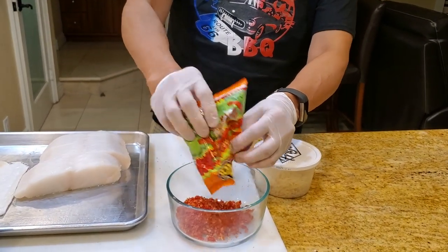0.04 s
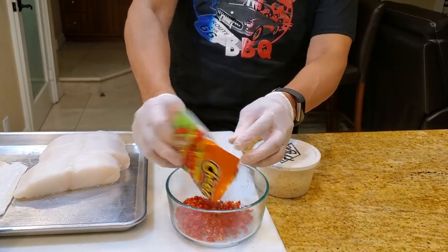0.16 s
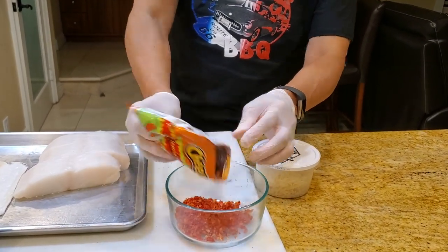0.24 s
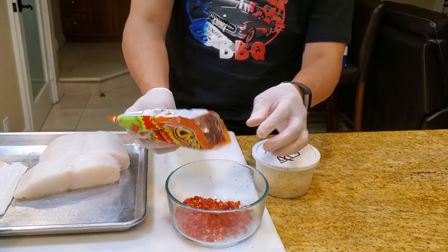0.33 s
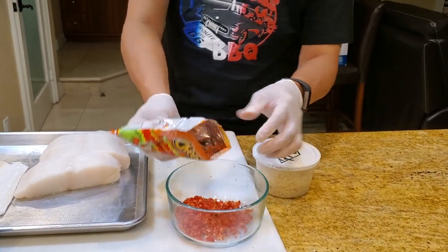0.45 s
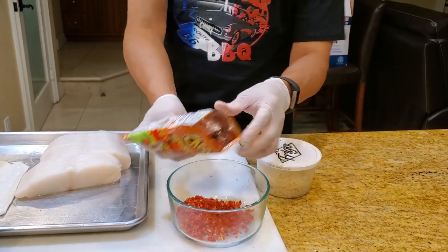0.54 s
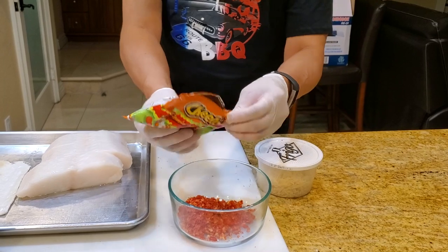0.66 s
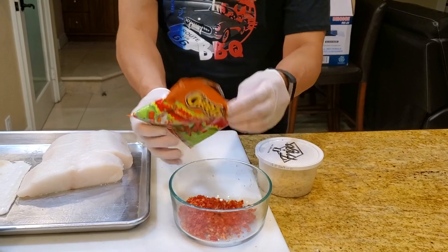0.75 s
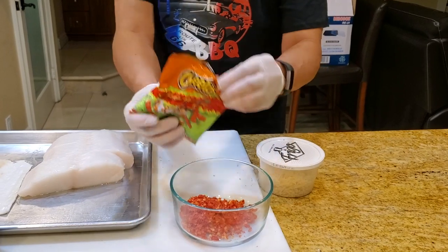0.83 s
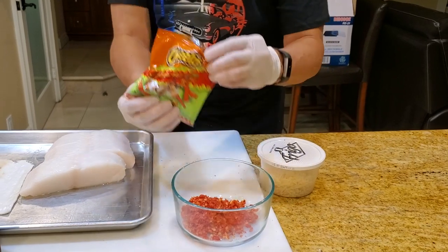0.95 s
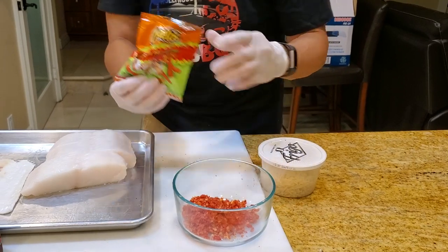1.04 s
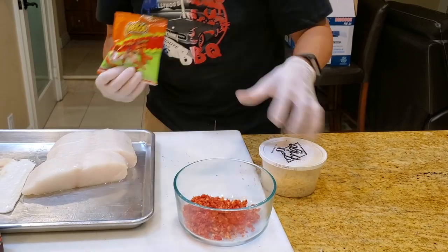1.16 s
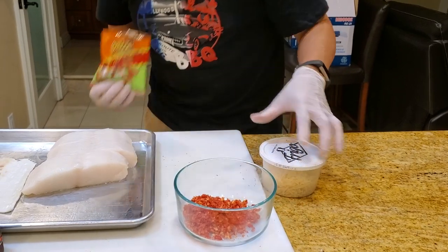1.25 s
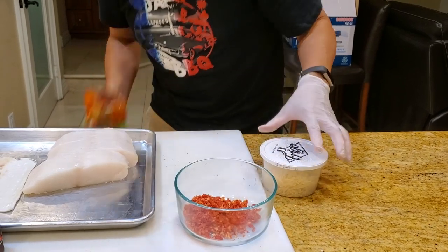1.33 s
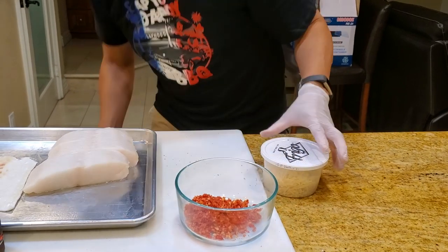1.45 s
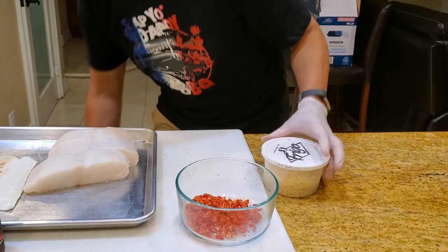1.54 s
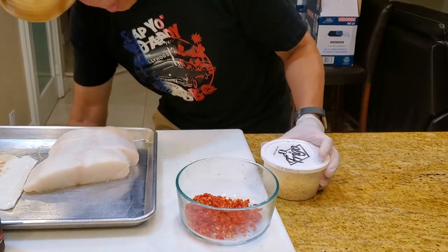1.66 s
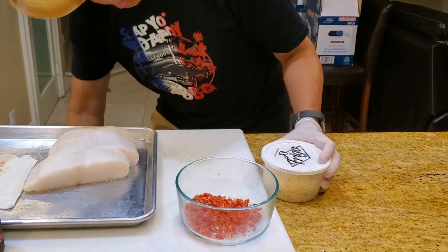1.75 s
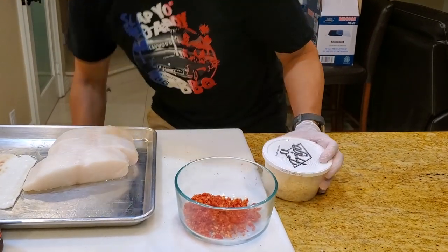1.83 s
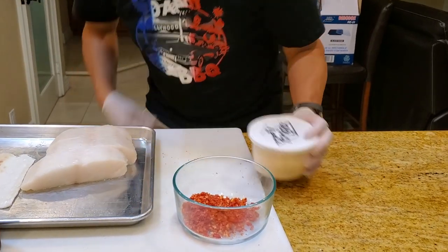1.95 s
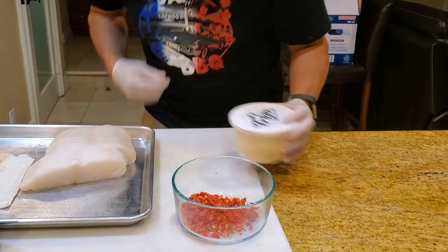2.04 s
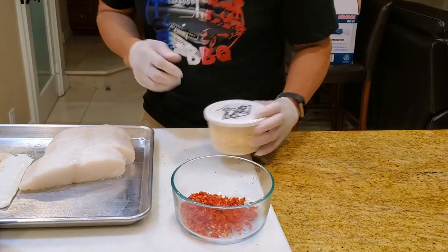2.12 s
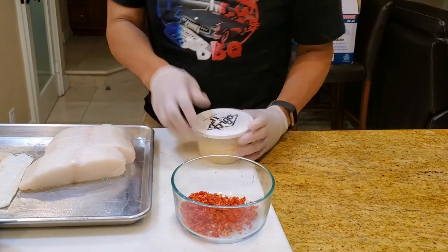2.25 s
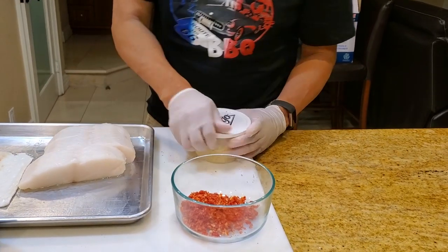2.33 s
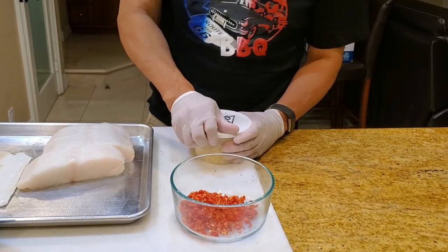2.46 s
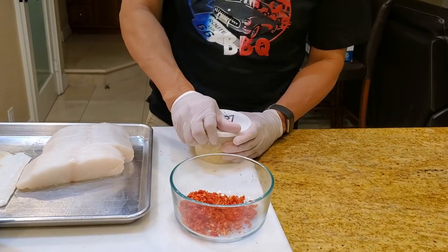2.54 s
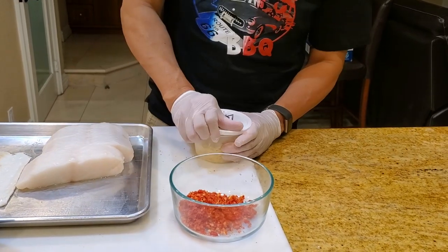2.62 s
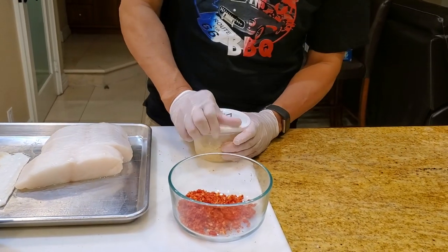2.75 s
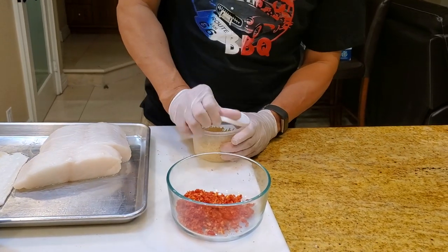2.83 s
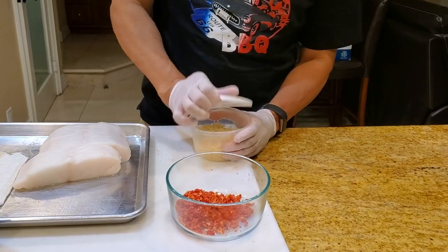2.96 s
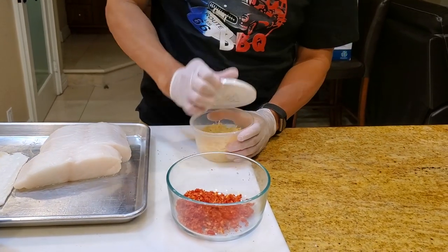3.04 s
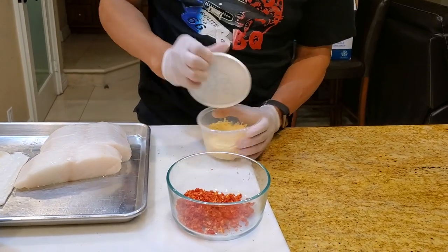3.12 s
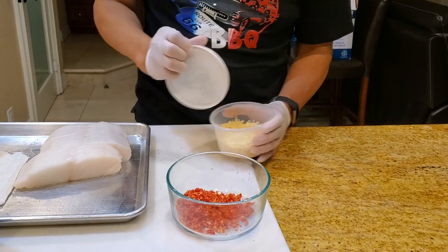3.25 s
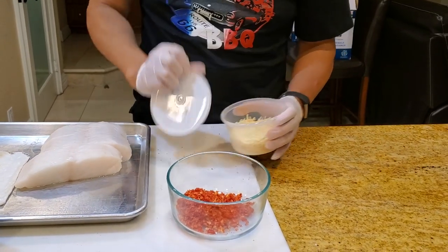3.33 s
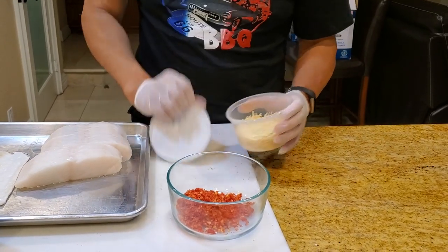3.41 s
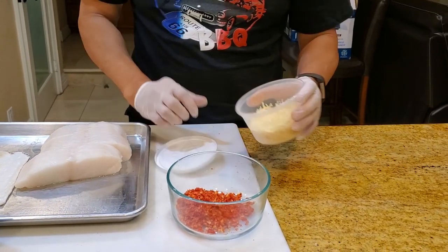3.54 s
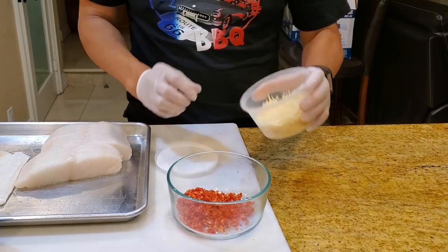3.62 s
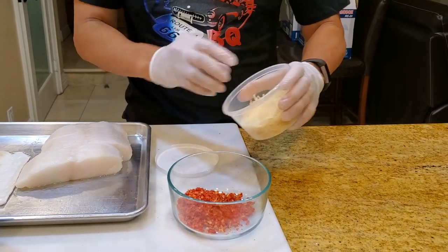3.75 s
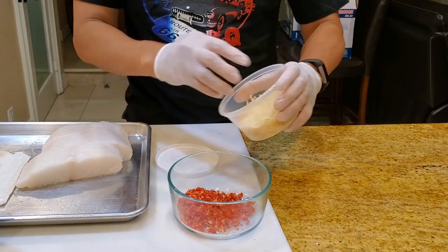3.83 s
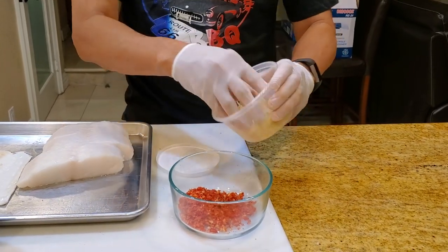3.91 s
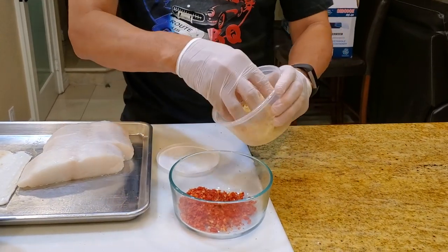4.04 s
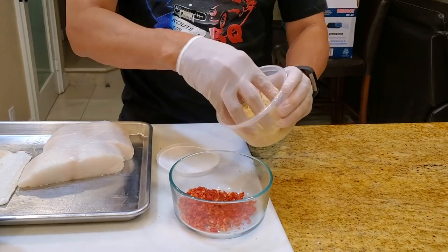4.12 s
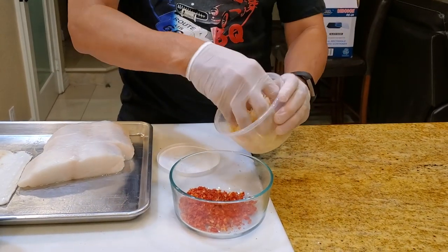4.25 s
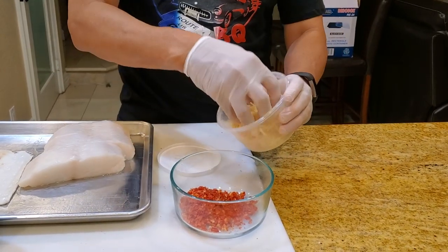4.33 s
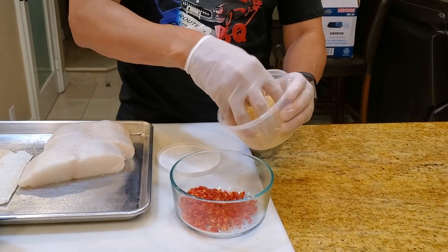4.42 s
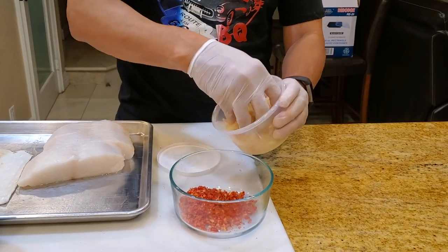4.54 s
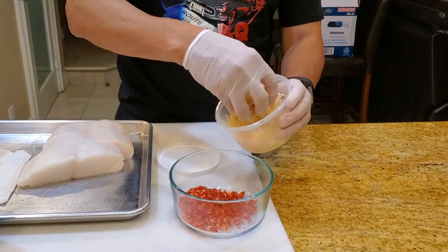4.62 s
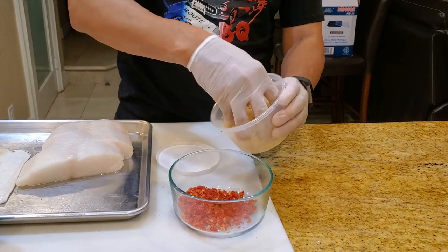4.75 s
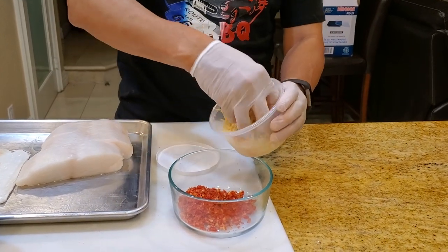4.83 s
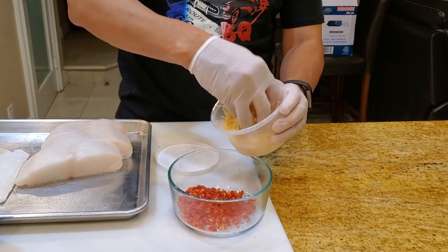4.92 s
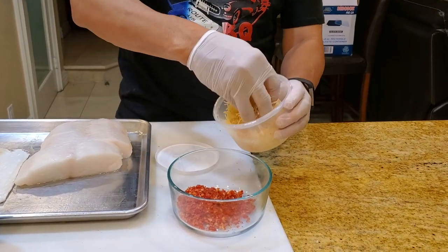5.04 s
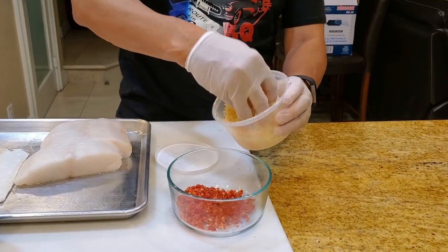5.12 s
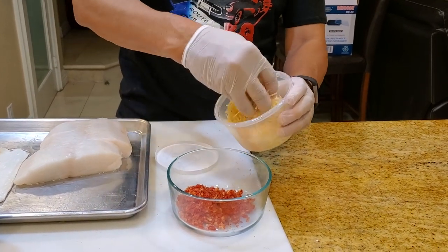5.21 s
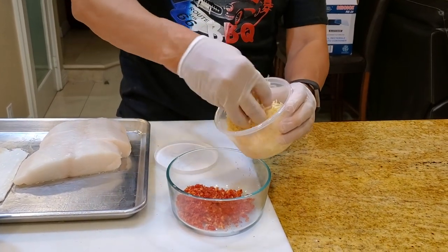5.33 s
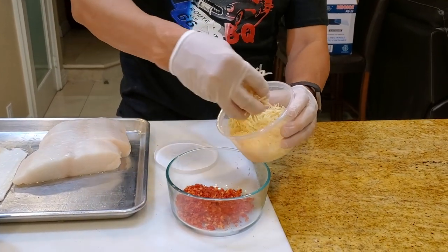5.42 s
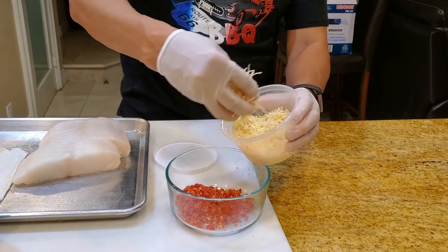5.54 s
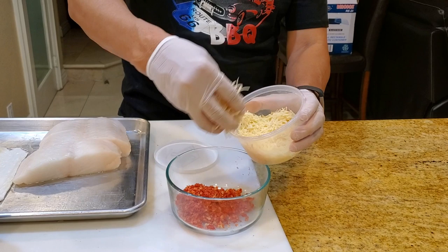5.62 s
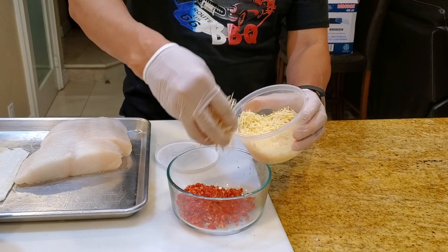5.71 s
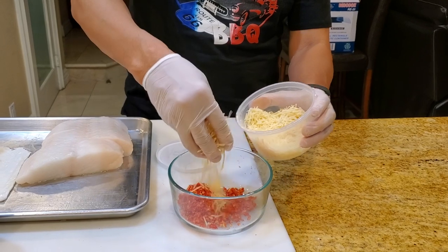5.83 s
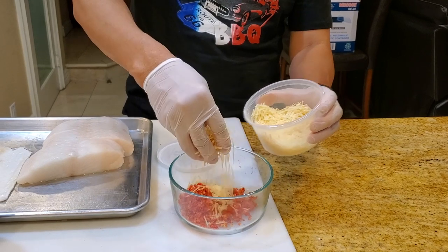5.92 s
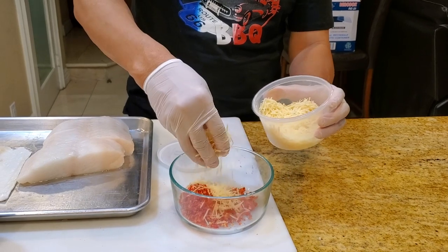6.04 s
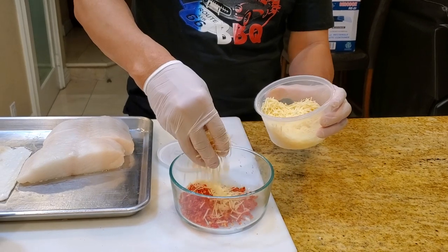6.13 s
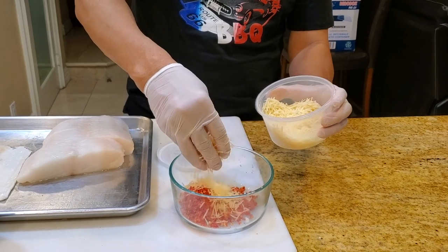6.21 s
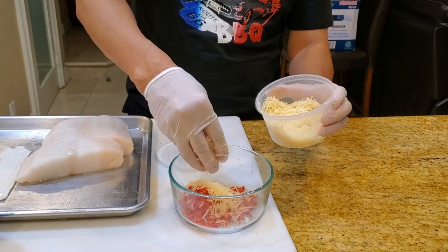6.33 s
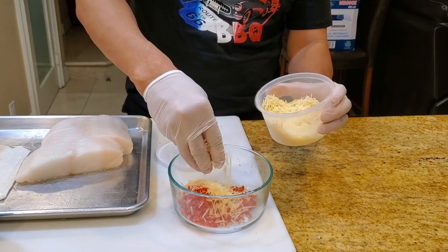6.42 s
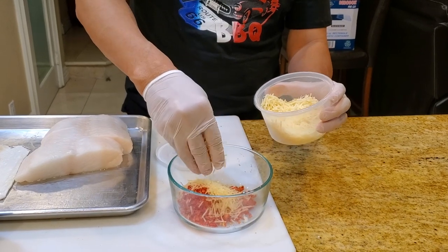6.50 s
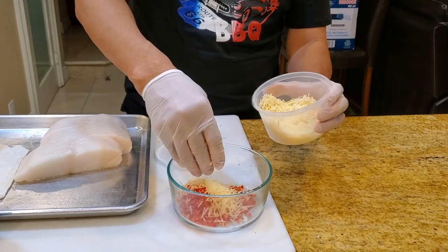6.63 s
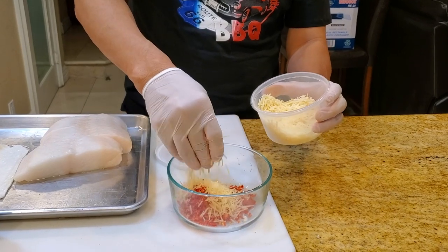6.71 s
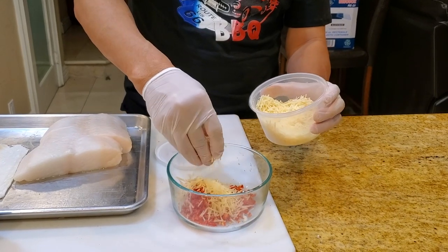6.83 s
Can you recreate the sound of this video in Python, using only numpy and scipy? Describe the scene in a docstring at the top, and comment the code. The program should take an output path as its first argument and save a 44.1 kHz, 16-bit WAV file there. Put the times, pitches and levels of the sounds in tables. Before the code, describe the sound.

A foil snack bag crackles loudly, then a plastic tub is set down, its lid pops off and drops, and shreds are rummaged and sprinkled into glass.

```python
"""In a hard-walled kitchen, gloved hands crumple a foil snack bag over the counter, slide and set down
a plastic tub, prise off its lid, drop it, dig in grated cheese and sprinkle it into a glass bowl.
Foil, rim and gloves are bursts of tiny slips that ring thin panels; tub, lid and bowl are sets of decaying modes.
The hollow pops are air ringing in the tub, and the rubbing is grainy noise in three bands that follow the hands.
The kitchen rings after the snaps and blows; bumps reach the microphone through the counter."""
import sys
import numpy as np
from scipy import signal
from scipy.fft import rfft, irfft, next_fast_len
from scipy.io import wavfile
from scipy.ndimage import uniform_filter1d

SR = 44100
rng = np.random.default_rng(int(sys.argv[2]) if len(sys.argv) > 2 else 0)


def store_wav(level_fs):
    """Save 16-bit WAV to argv[1]."""
    pcm = np.round(np.clip(np.atleast_2d(level_fs), -1, 1) * 32767)
    wavfile.write(sys.argv[1], SR, pcm.T.astype(np.int16))


N = 302967

# The lid lands flat on the board. Each row: start in seconds, level in dB, hardness in dB on the upper modes.
LID_DROPS = [(3.441, -20, 14), (3.513, -42, 10), (3.529, -30.5, 15.5), (3.55, -43, 17), (3.642, -37, 18),
             (3.75, -45, 19.5), (3.917, -49, 13.5)]
# Small creases while the gloves dig. One row: start and end in seconds, level in dB over the rubbing,
# lowest and highest pitch in Hz.
GLOVE_CREASES = (3.9, 5.65, 9, 3500, 5500)


def gain_of(db):
    """Turns decibels into an amplitude factor."""
    return 10 ** (np.asarray(db) / 20)


def evened(x):
    """Scales x to rms 1."""
    return x / np.sqrt(np.mean(x ** 2) + 1e-20)


def read(points, hz):
    """Reads a (Hz, value) curve along a logarithmic frequency axis."""
    f, value = np.transpose(points)
    return np.interp(np.log(hz + 1), np.log(f + 1), value)


def curve(rows, column):
    """Draws one column of a time table as straight lines over the whole scene."""
    columns = np.transpose(rows)
    return np.interp(np.arange(N) / SR, columns[0], columns[column])


def add(mix, s, sound):
    """Mixes a sound in at s seconds, cut at the end of the scene."""
    part = mix[round(s * SR):][:len(sound)]
    part += sound[:len(part)]


def coloured(x, points):
    """Gives x a spectrum, rms 1."""
    size = next_fast_len(N)
    gain = gain_of(read(points, np.fft.rfftfreq(size, 1 / SR)))
    return evened(irfft(rfft(x, size) * gain, size)[:N])


def snaps(rows, cycles, edge_db, low_hz):
    """A crease gives way in a short burst of slips: each rings the panel a few cycles and has a sharp edge."""
    out, t = np.zeros(N), np.arange(1500) / SR
    ring_t = t[:200]
    chance = rng.standard_normal((len(rows), 2, len(t)))
    band = signal.butter(2, [4500, 13000], "bandpass", fs=SR)
    for (s, db, hz, sharp_db, ms), (a, b) in zip(rows, chance):
        fade = np.exp(-t * 1000 / max(ms, .15))
        ring = np.sin(2 * np.pi * hz * ring_t) * ring_t * np.exp(-ring_t * hz / cycles)
        slips = 0.76 * a * abs(b) * fade
        slips[0] = 2.6  # a strong first release
        body = signal.convolve(slips, ring)[:len(t)]
        edge = signal.lfilter(*band, slips)
        body = body / abs(body).max()
        edge = gain_of(sharp_db + edge_db) * edge / abs(edge).max()
        add(out, s, gain_of(db) * (body + edge))
    return signal.lfilter(*signal.butter(3, low_hz, "highpass", fs=SR), out)  # thin sheet radiates no bass


def crackle(hands, span, count):
    """Rows of small creases at random times, pitches and lengths, as loud as the hands are busy."""
    start, end, over_db, low_hz, high_hz = span
    a, b, c, d, e = rng.random((count, 5)).T
    s = start + (end - start) * (np.arange(count) + a) / count
    busy_db = 20 * np.log10(hands.max(0)[(s * SR).astype(int)] + 1e-9)
    level_db = busy_db + over_db - 1.0 * np.log(b + .05)  # a few stand up to 3 dB out
    pitch_hz = low_hz * (high_hz / low_hz) ** c
    sharp_db, length_ms = -18 + 18 * d, 1.3 + 1.6 * e ** 2
    return list(zip(s, level_db, pitch_hz, sharp_db, length_ms))


def blows(rows, modes, split_hz, blur, uneven_db=1.54, rise_s=0.0014):
    """Each blow lands elsewhere and weights the same modes differently; loose plastic blurs their pitch."""
    out, t = np.zeros(N), np.arange(SR // 2) / SR
    hz, mode_db, t60 = np.transpose(modes)[:, :, None]
    for s, db, hard_db in rows:
        wander = rng.standard_normal((len(modes), len(t)))
        start_db = mode_db + uneven_db * wander[:, :1] + hard_db * (hz > split_hz)
        level_db = start_db - 60 * t / np.maximum(t60, .01)
        wander = uniform_filter1d(np.cumsum(wander, 1), 100) * blur * np.sqrt(hz / 1000)
        phase = 2 * np.pi * hz * t + wander - wander[:, :1]
        ring = (gain_of(level_db) * np.sin(phase)).sum(0)
        add(out, s, gain_of(db) * ring * (1 - np.exp(-t / rise_s)))
    return out


def strokes():
    """Each stroke swells to its peak and fades; gives the gains of middle, body and fizz."""
    # Foil and plastic under the hands. Each row: peak in seconds, level in dB, body under 1.5 kHz in dB over it,
    # fizz over 7 kHz in dB over it, rise in seconds, fall in seconds.
    rub_rows = [(.05, -27.5, -5, -6.5, .4, 0.5), (.24, -30.5, -2.5, 4.5, .15, 0.12),
                (.47, -50, 2, 6.5, .15, 0.23), (.65, -35.5, 6.5, 8.5, .06, 0.31),
                (.76, -36.5, 3, -14, .1, 0.19), (.94, -31, -7, -1.5, .15, .28),
                (1.33, -58, -0.5, -3, .2, 0.44), (1.69, -44, -2, -2.5, .35, 0.34),
                (1.83, -44, -1.5, -6, .2, 0.31), (2.281, -39, 9, -6.5, .03, 0.28),
                (2.45, -51, -0.5, -6.5, .15, 0.59), (2.8, -41, 11, 4, .06, .3),
                (2.95, -33, -3.5, -2, .15, 0.29), (3.07, -42, -5.5, -4.5, .1, 0.16),
                (3.66, -55, 9.5, 1, .3, 0.31)]
    # Fingers stir, lift and scatter the shreds. Each row: the same columns in the same units.
    stir_rows = [(3.92, -49.5, -1, -4, 0.022, 0.28), (4.12, -54.5, -1.5, -2.5, .06, 0.87),
                 (4.35, -50.5, -13.5, 2, .15, 0.066), (4.428, -42, -7, -5.5, 0.076, .2),
                 (4.585, -49, -4.5, -6, .04, 0.07), (4.74, -48.5, -6, -12, 0.23, 0.51),
                 (5.426, -52.5, -22, -1, 0.042, 0.061), (5.564, -52, 7.5, -16.5, .02, 0.24),
                 (5.626, -46.5, -18, -35, 0.066, 0.08), (5.9, -61, -6.5, 3, .3, 0.64),
                 (6.247, -66, -6, 1, .2, 0.1), (6.671, -70.5, 0, -5, .3, 0.21),
                 (6.86, -68, 2.5, -8, 0.21, .3)]
    stroke_db = 30  # drop in dB over one rise or fall time
    t, power = np.arange(0, N, 32) / SR, 0
    for s, db, body_db, fizz_db, rise, fall in [*rub_rows, *stir_rows]:
        away = np.where(t < s, (s - t) / max(rise, .005), (t - s) / max(fall, .005))
        level_db = db + np.array([[0], [body_db], [fizz_db]]) - stroke_db * away
        power = power + gain_of(level_db) ** 2
    return np.array([np.interp(np.arange(N) / SR, t, np.sqrt(p)) for p in power])


def background():
    """Low rumble of the house, the steady hush of the room and a thin wavering tone."""
    # Level of the rumble. Each row: time in seconds, level in dB.
    rumble_level = [(0.0, -42), (0.5, -54), (0.73, -49.5), (1.93, -53.5), (2.37, -43), (2.58, -49),
                    (3.04, -48.5), (3.25, -57), (3.92, -48), (4.44, -54), (6.12, -54.5), (6.87, -50.5)]
    # Spectrum of the rumble. Each row: frequency in Hz, relative level in dB per Hz.
    rumble_tone = [(15, -45), (25, -14.5), (43, 4), (87, 2), (117, -2.5), (151, -5), (194, -12.5),
                   (397, -21.5), (600, -42), (780, -64), (1320, -120)]
    # Spectrum of the hush. Each row: frequency in Hz, relative level in dB per Hz.
    hush_tone = [(120, -25), (200, 1), (529, -19), (1000, -20), (1160, -19.5), (1250, -23.5), (2210, -34),
                 (4520, -20.5), (7540, -30.5), (15100, -31), (16000, -36.5)]
    # Level of the thin tone before its waver. Each row: time in seconds, level in dB.
    whine_level = [(0, -81.5), (1.7, -71.5), (2.2, -78.5), (3.2, -89), (3.45, -76), (4.7, -73),
                   (6.87, -76.5)]
    hush_db, whine_hz = -60.5, 1168
    a, b, c = rng.standard_normal((3, N))
    waver = evened(uniform_filter1d(uniform_filter1d(c, 3000), 3000))
    phase = 2 * np.pi * whine_hz * np.arange(N) / SR + 0.7 * waver
    tone = gain_of(curve(whine_level, 1) + 2.0 * waver) * np.sin(phase)
    rumble = gain_of(curve(rumble_level, 1)) * coloured(a, rumble_tone)
    hush = gain_of(hush_db) * coloured(b, hush_tone)
    return rumble + hush + tone


def kitchen(x, turns_per_s):
    """Reverb of sparse taps of random sign, each band dying at its own speed; three tails take turns."""
    # How long the room rings. Each row: frequency in Hz, t60 in seconds.
    room_t60 = [(200, 0.57), (530, 0.47), (1390, 0.36), (3680, 0.4), (9700, 0.35)]
    at = np.arange(200, SR - 20, 20) + rng.integers(0, 20, (3, (SR - 201) // 20))
    taps = np.zeros((3, SR))
    np.put_along_axis(taps, at, rng.choice([-1., 1.], at.shape), 1)
    hz, t, z = signal.stft(taps, SR, nperseg=256)
    fade = gain_of(-60 * t / read(room_t60, hz)[:, None])
    tail = signal.istft(z * fade, SR, nperseg=256)[1]
    cycle = np.arange(N) * turns_per_s / SR + np.arange(3)[:, None] / 3
    turns = np.cos(2 * np.pi * cycle) * np.sqrt(2 / 3)  # the summed power stays even
    return signal.fftconvolve(x * turns, tail / np.linalg.norm(tail[0]), axes=1)[:, :N].sum(0)


def bumps():
    """The counter swings a few slow cycles, its pitch sagging; a short knock joins each start."""
    # Soft bumps carried by the counter. Each row: start in seconds, level in dB, pitch in Hz,
    # t60 in seconds, knock in dB relative to the swing.
    bump_rows = [(0.041, -23.5, 82, 0.09, -28), (1.316, -20.5, 92.4, 0.16, -40),
                 (1.971, -26.5, 60, 0.15, -9), (2.152, -32.5, 107, 0.18, -8), (2.298, -26, 55, 0.53, -14),
                 (2.504, -19.5, 87, 0.058, -4), (4.049, -24, 79, 0.13, -28), (4.114, -22.5, 105, 0.15, 0),
                 (4.408, -39, 65.8, 0.13, -15), (6.178, -21, 65.2, 0.19, -24.5),
                 (6.218, -27.5, 85.4, 0.15, -22), (6.377, -40, 124, 0.19, -24.5),
                 (6.564, -14.5, 108.2, 0.071, 0.5), (6.782, -30.5, 84, 0.16, -31.5),
                 (6.817, -39, 103.4, 0.38, -20)]
    out, t = np.zeros(N), np.arange(SR // 2) / SR
    for s, db, hz, t60, knock_db in bump_rows:
        bent_t = t + .004 * (1 - np.exp(-t / 0.0014))  # starts high and sags to its pitch
        swing = gain_of(-60 * t / max(t60, .03)) * np.sin(2 * np.pi * hz * bent_t)
        knock = gain_of(knock_db - 60 * t / 0.029) * np.sin(2 * np.pi * 230 * t)
        sway = gain_of(-10.0 - 60 * t / 0.21) * np.sin(2 * np.pi * 46 * t)  # the whole cabinet rocks
        add(out, s, gain_of(db) * (swing + knock + sway) * (1 - np.exp(-t / 0.0022)) ** 2)
    return out


def hollow_tap():
    """Something light and hollow is tapped and its few short modes ring."""
    # Each row: start in seconds, level in dB, hardness in dB on the upper modes.
    tap_rows = [(5.554, -26, -4.5)]
    # Modes of the hollow thing. Each row: frequency in Hz, relative level in dB, t60 in seconds.
    hollow_modes = [(427, -7.5, 0.051), (524, -4, 0.036), (661, -6.5, 0.067), (784, -8, .05),
                    (991, -0.5, 0.095), (1444, -17, .03)]
    return blows(tap_rows, hollow_modes, split_hz=900, blur=.07)


def bowl():
    """Every strike of a shred adds energy to the same three ringing glass modes."""
    # Shreds strike the glass. Each row: start in seconds, level in dB, hardness in dB on the top mode.
    sprinkle_rows = [(5.553, -49.5, 1), (5.6, -53, -12), (5.794, -57.5, 4.5), (5.83, -56, -5),
                     (5.865, -58, -8), (5.95, -59, 3), (6.06, -76, 0), (6.195, -70, -5), (6.76, -73.5, 0),
                     (6.815, -66, 8.5), (6.849, -63, -8)]
    # Glass modes. Each row: frequency in Hz, relative level in dB, t60 in seconds.
    glass_modes = [(2089, 3, 0.43), (3550, -8, 0.45), (5430, 7, 0.065)]
    t, power = np.arange(N) / SR, 0
    hz, mode_db, t60 = np.transpose(glass_modes)[:, :, None]
    for s, db, hard_db in sprinkle_rows:
        age = np.maximum(t - s, 0)
        level_db = db + mode_db + hard_db * (hz > 4000) - 60 * age / t60
        power = power + (gain_of(level_db) * (1 - np.exp(-age / 0.0026))) ** 2
    return (np.sqrt(power) * np.sin(2 * np.pi * hz * t)).sum(0)


def rubbing(hands, per_s, spread_db):
    """Dense tiny slips of uneven size mixed with smooth friction; body, middle and fizz follow the hands."""
    # Spectra of the low body, the middle of foil and plastic, the middle of shreds, and the fizz.
    # Each row: frequency in Hz, relative level in dB per Hz.
    body_tone = [(90, -31.5), (200, 1.5), (350, 4.5), (600, 2.5), (1200, 2.5), (1600, -2.5), (2500, -36)]
    rub_tone = [(900, -34), (1600, 3), (2500, 7), (4000, 6.5), (5500, 4.5), (7500, -11), (11000, -43)]
    stir_tone = [(1300, -21.5), (2400, -4), (3500, -2), (4800, -1.5), (5800, -5), (7500, -13.5),
                 (11000, -25)]
    fizz_tone = [(4000, -31.5), (6200, -9.5), (8000, -1), (10800, -3.5), (13000, -14.5), (15500, -5),
                 (17000, 0)]
    rub_grain, stir_grain = 0.43, 0.89  # share of slips against smooth friction
    slips = gain_of(spread_db * np.minimum(rng.exponential(1, N), 4)) * (rng.random(N) < per_s / SR)
    slips = signal.lfilter([1], [1, -.93], slips)  # each slip lasts a third of a millisecond
    stirring = np.arange(N) / SR > GLOVE_CREASES[0]  # shreds scratch higher than foil and plastic
    grain = np.where(stirring, stir_grain, rub_grain)
    drive = (np.sqrt(grain) * evened(slips) + np.sqrt(1 - grain)) * rng.standard_normal(N)
    middle = np.where(stirring, coloured(drive, stir_tone), coloured(drive, rub_tone))
    return (hands * (middle, coloured(drive, body_tone), coloured(drive, fizz_tone))).sum(0)


def glove_ticks(hands):
    """Glove wrinkles tick on the tub and its foot catches as it slides, all small bright slips."""
    # Glove wrinkles. Each row: start in seconds, level in dB, panel pitch in Hz.
    wrinkle_rows = [(3.9191, -37.5, 2087), (4.0213, -31, 4394), (4.102, -35, 5618), (4.121, -34, 4800),
                    (4.1628, -33.5, 5090), (4.2557, -38.5, 4886), (4.2933, -36.5, 4254),
                    (4.3251, -37.5, 4690), (4.352, -48.5, 4230), (4.4099, -26.5, 4860), (4.4262, -35, 5090),
                    (4.584, -29, 4860), (4.6527, -29, 4885), (4.6675, -31.5, 4720), (4.6997, -29.5, 4790),
                    (4.7324, -26.5, 3880), (4.7418, -29.5, 4950), (4.7934, -30.5, 4556),
                    (4.8316, -35.5, 4940), (4.8673, -39.5, 3864), (4.8902, -37, 4030), (4.9115, -47, 3906),
                    (5.3863, -38, 4160), (5.4124, -34, 4140), (5.4266, -27.5, 4215), (5.4465, -33.5, 5120),
                    (5.5543, -34.5, 2132), (5.5947, -40.5, 2074), (5.6221, -26, 5240)]
    # The foot catches. Each row: start in seconds, level in dB, panel pitch in Hz, sharp edge in dB, length in ms.
    slide_rows = [(1.6326, -39, 2346, -1.5, 3.9), (1.6472, -34.5, 1580, -6, 1.1),
                  (1.6607, -25, 1279, -5.5, 3.9), (1.6718, -34.5, 2592, -5, 8.0),
                  (1.713, -37, 3053, 4.5, 0.54), (1.732, -30.5, 2500.0, -1, 0.5),
                  (1.75, -41, 2890, 9.5, 12), (1.8132, -32.5, 2250, -6.5, 14)]
    edge_db, length_ms = -12, 2.4
    wrinkles = [(*row, edge_db, length_ms) for row in wrinkle_rows]
    rows = [*wrinkles, *crackle(hands, GLOVE_CREASES, count=40), *slide_rows]
    return snaps(rows, cycles=0.97, edge_db=0.0, low_hz=1550)


def tub_knocks():
    """Blows set the plastic walls of the tub ringing."""
    # Each row: start in seconds, level in dB, hardness in dB on the upper modes.
    knock_rows = [(1.662, -25, -12), (1.715, -32.5, -24.5), (1.809, -39.5, -1), (2.149, -42.5, -13),
                  (2.25, 0, -13.5), (2.457, -37.5, -23.5), (2.608, -30.5, -23.5), (2.691, -34.5, -7),
                  (2.734, -33, -11.5)]
    # Modes of the tub. Each row: frequency in Hz, relative level in dB, t60 in seconds.
    tub_modes = [(248.4, -20, 0.18), (282, -4, 0.18), (455, -6, 0.17), (501.4, -7, 0.24),
                 (548, -8.5, 0.087), (640, -17.5, 0.069), (784, -4, 0.15), (868, -9, 0.35), (1169, -9, 0.1),
                 (1280, -11, 0.058), (2040, -15, 0.093)]
    return blows(knock_rows, tub_modes, split_hz=700, blur=0.0028)


def pops():
    """The air in the tub is jolted and rings a few cycles; the wall answers softer at a fixed pitch."""
    # Hollow pops as the seal opens. Each row: start in seconds, level in dB, air pitch in Hz.
    pop_rows = [(2.765, -11.5, 576), (2.778, -7, 499.6), (2.786, -4, 438), (2.797, -0.5, 466.4),
                (2.88, -12, 415), (2.904, -13, 404), (2.926, -2, 711), (2.936, 0, 603.4), (2.948, -2, 620),
                (2.957, -0.5, 564.4), (2.976, -10.5, 772), (3.004, -17, 467), (3.088, -17, 506)]
    air_t60_s, wall_t60_s = 0.021, 0.058
    out, t = np.zeros(N), np.arange(SR // 4) / SR
    for s, db, hz in pop_rows:
        air = gain_of(-60 * t / air_t60_s) * np.sin(2 * np.pi * hz * t)
        wall = gain_of(-16.5 - 60 * t / wall_t60_s) * np.sin(2 * np.pi * 900 * t)
        add(out, s, gain_of(db) * (air + wall) * (1 - np.exp(-t / .0012)))
    return out


def lid_drops():
    """The lid claps flat on the board: short plate modes, strongly blurred."""
    # Modes of the lid. Each row: frequency in Hz, relative level in dB, t60 in seconds.
    disc_modes = [(454, 5, 0.062), (877, -11, 0.063), (1180, 2, 0.009), (1395, -3.5, 0.024),
                  (1548, -2.5, 0.014), (1922, -6, 0.055), (2660, -4, 0.013), (3870, -7, 0.02),
                  (4460, -20.5, 0.02)]
    return blows(LID_DROPS, disc_modes, split_hz=750, blur=0.068)


def lid_snaps(hands):
    """Snaps are bright while the rim peels off; dull once the lid lies on the board behind the bowl."""
    # The rim slips, snaps and bounces. Each row: start in seconds, level in dB, panel pitch in Hz,
    # sharp edge in dB before the lid's common edge level is added, length in ms.
    rim_rows = [(2.2513, -12, 1890, -11.5, 3.6), (2.2844, -26.5, 1360, -13.5, 1.5),
                (2.3054, -20.5, 1440, -4.5, 2.4), (2.4598, -24, 1740, -5.5, 3.5),
                (2.5905, -36.5, 4300, -6.5, 2.4), (2.6319, -31, 3810, -4.5, 1.3),
                (2.6918, -38.5, 2330, -12, 3.2), (2.769, -9, 3180, -3.5, 3.6),
                (2.7769, -6.5, 3090, -2, 3.6), (2.7827, -3.5, 3010, -2.5, 0.53),
                (2.7892, -10.5, 1640, 3.5, 1.8), (2.8054, -17.5, 1390, -1.5, 2.5),
                (2.8454, -19, 2130, -3, 0.91), (2.8789, -19.5, 3140, -2, 1.8),
                (2.9034, -21.5, 2980, -5.5, 1.5), (2.9116, -11, 4750, -6.5, 1.7),
                (2.9257, -4, 3770, -9, 1.8), (2.9364, -6.5, 3690, -8, 3.6), (2.9584, -6.5, 2730, -8, 1.4),
                (2.9628, -12.5, 1815, -3.5, 2), (2.9687, -12.5, 1940, 4, 3.6),
                (2.9774, -0.5, 3910, -20.5, 1.7), (3.0355, -5.5, 5500, -8.5, 1.8),
                (3.0889, -15.5, 3500, -8.5, 1.5), (3.0984, -13.5, 5500, -11.5, 3.1),
                (3.1128, -4.5, 2790, -2.5, 1.4), (3.4401, -6, 3690, -14.5, 2.6),
                (3.4464, -13, 1390, -4.5, 1.15), (3.5124, 0.5, 3580, -6, 1.3), (3.5203, -15, 1760, -9, 1.2),
                (3.5284, -6.5, 3840, -9, 1.2), (3.5304, -11.5, 1870, -13, 2.1),
                (3.5498, -15, 1880, -15.5, 2.4), (3.6431, -12, 2940, -21.5, 1.2),
                (3.6601, -9.5, 2850, -16.5, 3.6), (3.6784, -19.5, 2030, -3.5, 1.5),
                (3.7504, -8, 3120, -18, 2.7)]
    # Small random creases. One row: start and end in seconds, level in dB over the rubbing,
    # lowest and highest pitch in Hz.
    rim_creases = (2.38, 3.85, 12, 1300, 5000)
    rows = [*rim_rows, *crackle(hands, rim_creases, count=50)]
    lid = snaps(rows, cycles=0.31, edge_db=3.0, low_hz=920)
    landed = np.arange(N) / SR > LID_DROPS[1][0] - .01
    dull = signal.lfilter(*signal.butter(2, 5000, fs=SR), lid)
    return np.where(landed, dull, lid)


def bag_snaps(hands):
    """The foil bag buckles in loud single creases among many small random ones."""
    # The loudest creases. Each row: start in seconds, level in dB, panel pitch in Hz,
    # sharp edge in dB before the bag's common edge level is added, length in ms.
    crease_rows = [(0.0164, -15, 2009, -6, 3.8), (0.0358, -20.5, 1436, -8, 1.8),
                   (0.0454, -8, 4060, -6, 2.5), (0.0688, -15, 3370, -11, 1.5),
                   (0.0786, -6, 1634, -6.5, 1.8), (0.092, -8.5, 2310, -7, 1.8),
                   (0.1186, -7.5, 3980, -2.5, 3.4), (0.1262, -10, 1980, -2.5, 1.8),
                   (0.1442, -5.5, 5115, -14.5, 1.6), (0.154, -16.5, 1865, -15.5, 1.6),
                   (0.174, -1.5, 4140, -9.5, 0.92), (0.1835, -3, 4415, -6.5, 1.8),
                   (0.1883, -14.5, 1792, -7.5, 3.5), (0.2192, -18, 1765, -6.5, 2.7),
                   (0.234, -18, 1820, -6, 3.2), (0.2524, -18, 2270, -5, 2.1), (0.3384, -8.5, 3826, -6, 2.7),
                   (0.3674, -10.5, 4710, -9, 2.3), (0.4512, -20, 5750, -6, 1.2),
                   (0.4638, -26.5, 1780, 2, 1.5), (0.4764, -22.5, 3943, -7.5, 5.4),
                   (0.577, -39, 1695, -10.5, 3.6), (0.595, 2.5, 4490, -17, 0.6),
                   (0.5973, -8, 4690, -9, 0.78), (0.6234, -22, 4195, -8.5, 1.8),
                   (0.6288, -18, 1243, -0.5, 2.5), (0.6356, -14, 1770, -4, 2.6),
                   (0.6456, -13.5, 4433, -8, 2.1), (0.654, -6.5, 4810, -12, 2.7),
                   (0.6696, -3.5, 3990, -4.5, 5.4), (0.7115, -18.5, 2062, -7, 2.9),
                   (0.7387, -9, 3750, -10.5, 1.5), (0.7516, -8, 3460, -2.5, 4.9),
                   (0.76, -14, 2390, -6.5, 1.8), (0.7659, -15, 2590, -8, 1.8),
                   (0.848, -14, 1504, -6.5, 2.1), (0.8802, -18.5, 2740, -9, 2.3),
                   (0.8935, -10.5, 1270, -3, 2.1), (0.9029, -13, 1430, -6, 1.8),
                   (0.9059, -9.5, 1537, -8.5, 4.8), (0.9136, -13.5, 1420, -6, 1.8),
                   (0.9199, -8, 3430, -8.5, 1.6), (0.932, -15.5, 1260, -0.5, 0.75),
                   (0.943, -11, 1354, -5.5, 1.8), (0.9463, -16.5, 2630, 4.5, 1.8),
                   (0.9781, -17.5, 1280, -4.5, 3.9), (0.981, -10.5, 4980, -8, 1.8),
                   (0.9981, -9.5, 4374, -8.5, 1.7), (1.0385, -13, 4540, -6.5, 1.1),
                   (1.076, -34.5, 2405, 10, 1.1), (1.1818, -19, 3190, -5, 2.6),
                   (1.3287, -28.5, 2540, -13.5, 1.6)]
    # Small random creases. One row: start and end in seconds, level in dB over the rubbing,
    # lowest and highest pitch in Hz.
    small_creases = (0, 1.4, 14, 1300, 5500)
    rows = [*crease_rows, *crackle(hands, small_creases, count=80)]
    return snaps(rows, cycles=0.47, edge_db=4.0, low_hz=650)


def scene():
    """Mixes the direct sounds with the background and two room sends, one for snaps and one for hollow things."""
    hands = strokes()
    bag, lid, glove = bag_snaps(hands), lid_snaps(hands), glove_ticks(hands)
    tub, disc, tap, seal = tub_knocks(), lid_drops(), hollow_tap(), pops()
    snap_send = gain_of(-10.5) * bag + gain_of(-7.5) * glove + gain_of(-7.5) * lid
    hollow_send = gain_of(-2) * disc + gain_of(-3) * tap + gain_of(-12.5) * tub + gain_of(-6) * seal
    struck = bag + lid + glove + tub + disc + seal + tap + bowl() + bumps()
    rubbed = rubbing(hands, per_s=880, spread_db=-2.0)
    room = kitchen(snap_send, turns_per_s=300) + kitchen(hollow_send, turns_per_s=25)
    return (struck + rubbed + room + background())[None]


def record(dry):
    """The microphone drops the deepest bass, the loudest peaks touch the ceiling; then the band limit."""
    edge_hz = 15950
    held = np.clip(signal.lfilter(*signal.butter(4, 38, "highpass", fs=SR), dry), -.97, .97)
    low_pass = signal.firwin(255, edge_hz, window=("kaiser", 8), fs=SR)
    return signal.oaconvolve(held, low_pass[None], "same")


dry = scene()
out = record(dry)
store_wav(out)
```